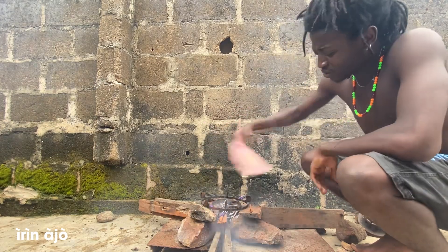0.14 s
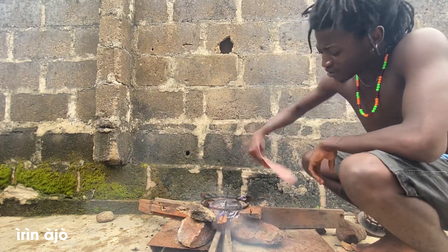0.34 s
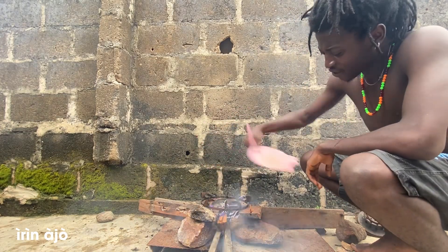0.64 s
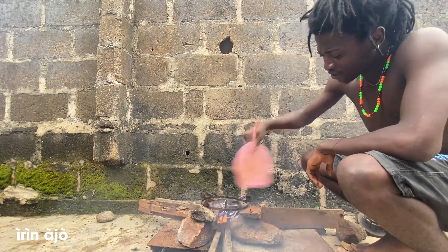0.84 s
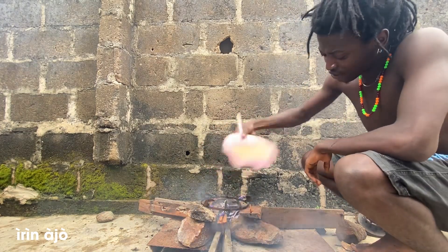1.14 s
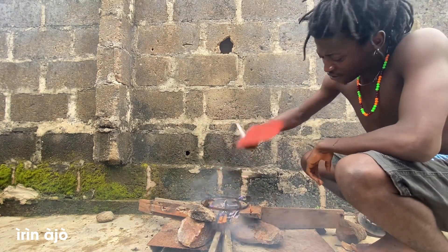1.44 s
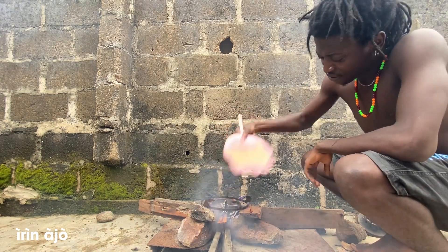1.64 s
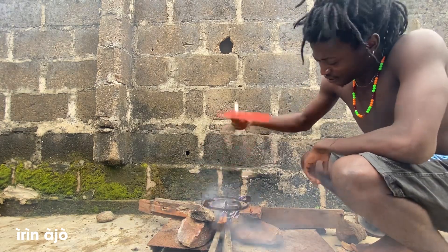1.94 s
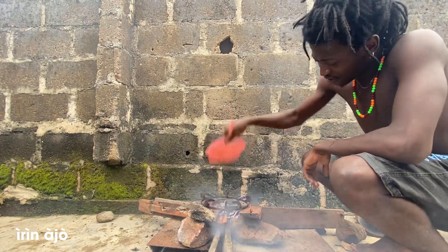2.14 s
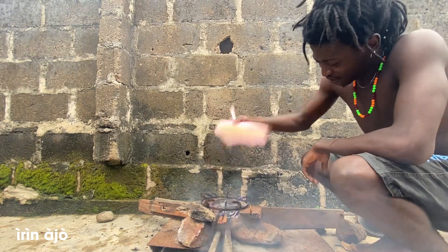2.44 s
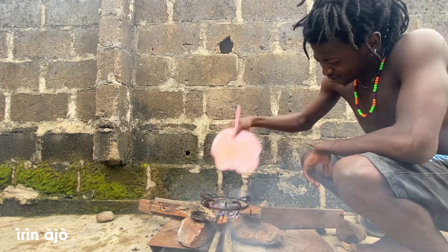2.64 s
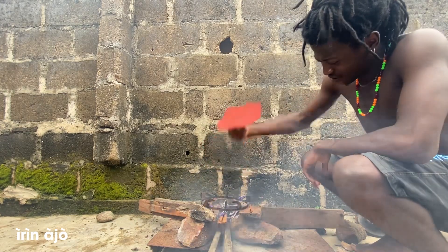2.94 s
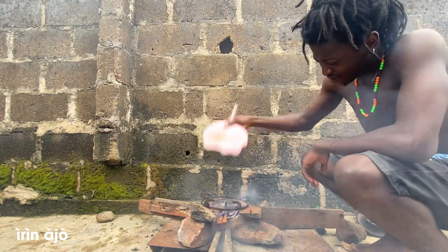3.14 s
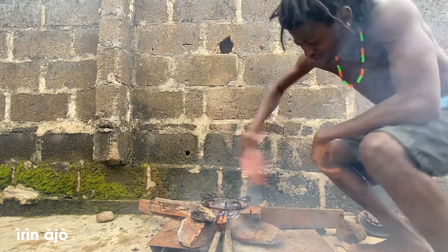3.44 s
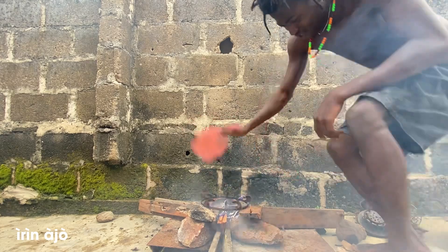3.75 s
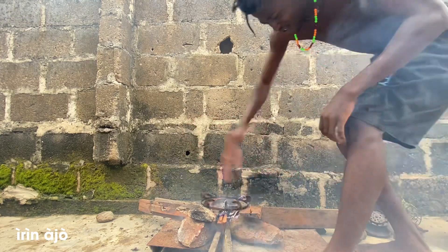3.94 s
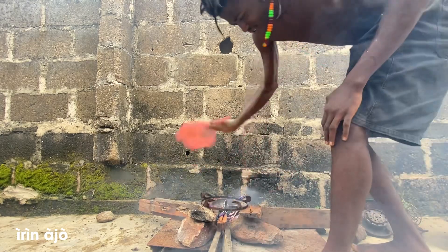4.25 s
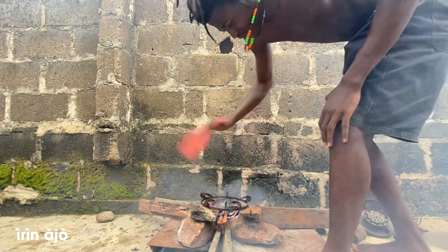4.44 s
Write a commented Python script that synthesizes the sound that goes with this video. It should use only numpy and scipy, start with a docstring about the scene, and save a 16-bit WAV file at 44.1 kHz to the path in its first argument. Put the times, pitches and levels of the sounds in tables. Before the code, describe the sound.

Outdoors in a walled yard, a stiff plastic fan beats about four times a second, each stroke an airy swish, a fluttery snap and a low thump. A small wood fire rumbles softly and ticks. Just before two seconds a log splits with a very loud crack, then the flaps grow louder and snappier, easing as feet scuff on grit. Close stereo microphone, short wall echoes.

```python
"""A plastic hand fan is waved about four times a second over a small wood fire in a walled yard.
Each stroke swishes as shaped noise, and the thin blade snaps over: throbbing tones flutter above low thumps.
The draught makes the flames, layers of noise, rumble and flutter more while a hiss sinks; embers tick.
One log splits in a quick run of cracks that ring it, and feet scuff as the fanner stands up."""
import sys
import numpy as np
from scipy import signal
from scipy.fft import rfft, irfft, next_fast_len
from scipy.io import wavfile
from scipy.ndimage import uniform_filter1d

SR = 44100
rng = np.random.default_rng(int(sys.argv[2]) if len(sys.argv) > 2 else 0)


def unload_wav(signal):
    """Save mono or channel-first audio to the path in sys.argv[1] as 16-bit WAV at rate SR, clipped to [-1, 1]."""
    wavfile.write(
        sys.argv[1],
        SR,
        np.round(np.clip(np.atleast_2d(signal).T, -1, 1) * 32767).astype(np.int16),
    )


def ratio(d):
    """dB to gain"""
    e = np.asarray(d, float) / 20
    return 10 ** e


N = 203389   # samples

# Air of the yard: pitch_hz, relative level_db
YARD_SPECTRUM = [(25, -0.5), (45, 6.5), (150, -8), (380, -18), (500, -18.5), (820, -23.5), (1650, -30),
                 (4000, -52)]
# Echoes of the yard walls: pitch_hz, echo level_db, t60_s
WALL_ECHOES = [(99.5, -14, 1), (252, -2, 0.071), (453, -1.5, 0.2), (740, -10.5, 0.24), (1115, -13.5, 0.26),
               (2000, -10.5, 0.36), (4944, -12.5, 0.23), (8000, -13, 0.35), (12000, -10.5, 0.25)]
# The two microphone ports: pitch_hz, left over right_db, left lead_rad, likeness of diffuse sound (0-1)
MIC_PORTS = [(60, -6.5, -.3, .97), (170, -7.2, -.1, .86), (300, -7, .5, .5), (550, -2, 1.6, .3),
             (1000, -2, .9, .3), (2000, 2, -.5, .3), (6500, 2, -.6, .2), (8000, 0, -1.2, .2),
             (9300, -1, -3.14, .2), (10300, -1, -5.4, .2), (12500, -1, -8.0, .2), (15000, -1, -10.5, .2)]
# Levels of the rumble, flutter and hiss layers between gusts: time_s, rumble_db, flutter_db, hiss_db
FLAME_LEVELS = [(0.0, -56.5, -62.5, -63.5), (0.25, -82, -80, -68), (0.6, -60.5, -67.5, -59.5),
                (1.0, -50, -59.5, -74), (1.2, -51.5, -77, -62), (1.4, -51.5, -57, -62.5),
                (1.6, -51, -68, -91), (1.779, -52, -71, -48), (1.951, -49, -55, -76),
                (2.178, -86, -88, -71), (2.339, -47, -60.5, -62), (2.702, -48, -63, -73.5),
                (3.1, -51.5, -59, -74), (3.39, -44.5, -77, -64.5), (3.54, -66, -77, -59.5),
                (3.621, -49, -79.5, -53.5), (3.8, -47.5, -63, -61), (4.169, -56.5, -74, -57),
                (4.3, -54, -77.5, -55.5), (4.47, -52.5, -74.5, -61.5), (4.61, -50.5, -64.5, -54.5)]
# Colours of the three flame layers: pitch_hz, relative level_db
RUMBLE_SPECTRUM = [(25, -8.5), (55, 10.5), (85, -7.5), (112, 7.5), (135, -7.5), (161, 7), (190, 0.5),
                   (262, -5), (380, -5.5), (600, -48)]
FLUTTER_SPECTRUM = [(250, -23.5), (400, 28), (500, 17.5), (650, 28), (900, 14), (1300, -16.5),
                    (2000, -50.5)]
HISS_SPECTRUM = [(900, 0.5), (1650, -7), (3500, -12), (7110, -19.5), (9320, -17.5), (11300, -21.5),
                 (12400, -18), (13200, -37.5), (16000, -54.5)]
# Level change at a full gust, rumble and flutter rise, hiss sinks: rumble_db, flutter_db, hiss_db
GUST_CHANGES = (6, 11, -4.8)
# The louder ember ticks: start_s, peak level_db, ring pitch_hz, sputter decay_ms
EMBER_TICKS = [(0.2385, -44.5, 2960, 2.5), (0.268, -43, 2260, 1.6), (0.42, -53.5, 5100, 3.2),
               (0.4893, -39.5, 3250, 2.4), (0.601, -58, 10600, 1), (0.700, -43, 4260, 3),
               (0.791, -61, 10700, 1), (0.899, -55.5, 3460, 7.7), (1.1109, -48.5, 2780, 2),
               (1.177, -45, 2400, 3.2), (1.4716, -53, 1960, 1.8), (1.5833, -50, 10900, 2.1),
               (1.6628, -58, 3465, 2), (2.095, -56, 10340, 0.73), (2.138, -52, 10640, 0.78),
               (2.2, -53, 8700, 1.6), (3.3644, -48.5, 2710, 1.7), (3.38, -48.5, 3780, 6.7),
               (3.409, -53, 3920, 1.5), (3.53, -59, 900, 2), (3.759, -49, 4230, 2.9),
               (4.0148, -53, 2130, 2), (4.192, -53.5, 10800, 1.5), (4.232, -55.5, 11050, 2.4),
               (4.373, -60.5, 2090, 2.6)]
# Soles on gritty ground: loudest_s, level_db, rise and fade scale_ms, brightness_db
SOLE_SCUFFS = [(3.193, -56.5, 2.5, 3.5), (3.36, -57, 18.5, 0), (3.492, -66, 16, -4),
               (3.595, -55, 24.5, 1.5), (3.647, -54.5, 27, 3), (3.74, -58, 24, 15.5),
               (3.872, -48.5, 14.5, 14), (3.898, -51, 17, 12), (3.968, -57, 19.5, 5.5)]
# Colour of the scuffs: pitch_hz, relative level_db
SCUFF_SPECTRUM = [(880, -1.5), (1500, -1), (1660, -13.5), (3250, -15), (5490, -9.5), (7840, -15),
                  (11300, -10), (16000, -13.5)]
# Log splitting, then bits dropping in the fire: start_s, snap peak_db, body peak_db, low cut_hz, high cut_hz
LOG_CRACKS = [(1.7680, -7.5, -4.5, 480, 9000), (1.771, -26, -8, 427, 5100), (1.7760, -2.5, -9.5, 330, 8900),
              (1.7800, -17, -5, 170, 4470), (1.7870, -26.5, -10.5, 90, 1500),
              (1.858, -59, -23.5, 279.3, 948), (1.8760, -60, -32, 480, 750), (1.8930, -56, -27, 100, 693),
              (1.9280, -58.5, -38, 450, 705)]
# Ringing modes of the log: pitch_hz, level_db, t60_s
LOG_RINGS = [(108, 0, 0.11), (161, -1.5, 0.24), (205, -2.5, 0.15), (270, 0.5, 0.078), (389, -4.5, 0.22),
             (610, -3, 0.02), (675, 6, 0.11), (870, -2, 0.078), (1135, -1, 0.024), (1321, 3.5, 0.008),
             (1830, -3, 0.014), (2220, -5.5, 0.014), (2565, -6, 0.011), (3840, -1.5, 0.0037)]
# Air past the blade edge: loudest_s, level_db, rise and fade scale_ms, brightness_db
BLADE_SWISHES = [(0.089, -61, 9, 20.5), (0.249, -53, 8, 17), (0.269, -57, 10, 20), (0.31, -62, 25, 14),
                 (0.467, -57.5, 23, 10), (0.551, -49.5, 9.5, 1), (.612, -69.5, 21, -12), (0.69, -55, 2, 19),
                 (0.703, -52.5, 6, 12), (0.743, -54.5, 20, 0), (1, -51.5, 34, 2), (1.026, -46, 8, 21.5),
                 (1.265, -43.5, 19, 3.5), (1.53, -44, 16.5, -1), (1.601, -71.5, 52.5, -8.5),
                 (2.147, -57.5, 37, 5), (2.272, -72, 15, -9), (2.335, -46, 13.5, 3),
                 (2.362, -48.5, 16.5, 3), (2.566, -47, 14, -4), (2.592, -53.5, 14.5, 8),
                 (2.795, -45.5, 20, 1.5), (3.045, -55, 25.5, -8.5), (3.834, -66, 42.5, -15.5),
                 (4.11, -48.5, 20.5, 5.5), (4.341, -47, 31.5, 8.5), (4.421, -62.5, 28, 15),
                 (4.574, -48, 43, 10.5)]
# Colour of the swishes: pitch_hz, relative level_db
SWISH_SPECTRUM = [(500, -13.5), (1090, 3.5), (1570, -9.5), (2070, -7), (2500, -13), (3000, -13),
                  (6400, -26), (8200, -36.5), (9330, -33.5), (11400, -28.5), (13000, -36.5), (15000, -51)]
# The whole blade jolting: start_s, peak level_db, favoured pitch_hz, length_ms
BLADE_THUMPS = [(0.247, -43, 420, 12), (0.495, -66, 91.5, 33), (0.493, -30.5, 347, 16),
                (0.55, -38, 162, 12.6), (0.697, -58, 205, 21), (0.76, -30, 404, 13),
                (0.821, -31.5, 118, 22), (0.902, -47, 272, 7.8), (1.023, -30.5, 246, 13),
                (1.085, -36.5, 116, 25), (1.151, -41.5, 173, 8.5), (1.176, -35, 112.5, 11),
                (1.31, -42.5, 264, 9.3), (1.351, -32, 200.1, 13.3), (1.412, -37.5, 169.9, 15),
                (1.445, -41, 138.8, 16), (1.579, -37, 260, 9.8), (1.629, -29.5, 196, 20),
                (1.691, -47.5, 148.1, 11), (2.137, -35.5, 147, 25.2), (2.186, -29.5, 125, 18),
                (2.3, -45.5, 91.5, 6.2), (2.353, -37.5, 113, 18), (2.422, -24, 202, 8.4),
                (2.436, -39, 102, 16), (2.611, -39.5, 194, 17), (2.654, -25, 156.8, 19.5),
                (2.666, -43, 264, 5.6), (2.801, -39, 188.8, 16.6), (2.838, -33.5, 205, 11.3),
                (2.875, -31.5, 266, 18), (2.905, -35, 108, 10.4), (3.08, -37.5, 215, 35),
                (3.129, -26, 262, 3), (3.271, -28.5, 510, 22), (3.285, -34.5, 200, 24),
                (3.37, -41.5, 166.6, 12.6), (3.55, -39.5, 318, 8.9), (3.571, -38.5, 102, 19.4),
                (3.647, -33.5, 116, 5.4), (3.794, -39.5, 332, 22), (3.814, -33.5, 105, 20),
                (3.882, -30.5, 145, 7.3), (4.033, -29, 344, 11.9), (4.059, -36.5, 113, 20),
                (4.122, -34, 161, 8.3), (4.265, -33, 202, 17), (4.289, -30, 115, 16),
                (4.34, -34.5, 205, 16), (4.354, -38.5, 161, 9.1), (4.496, -34.5, 347, 8.2),
                (4.519, -34.5, 112, 12.8), (4.582, -33, 152, 17)]
# Low modes rung by each jolt, before each jolt's shift: pitch_hz, level_db, t60_s
LOW_MODES = [(108, 3, 0.097), (161, -4, 0.14), (205, 4, 0.028), (264, -1, 0.32), (318, 0.6, 0.024),
             (347, 0.75, 0.043), (600, 0, 0.098), (650.2, -0.5, 0.098)]
# Blade snapping over: start_s, level_db, mid-burst pitch_hz, glide (share of pitch), length_ms
BLADE_FLAPS = [(0.236, -38, 880, -0.18, 5.9), (0.246, -27.5, 822, 0.35, 24.2), (0.488, -40, 1040, 0.13, 4),
               (0.496, -28, 772, -0.014, 16), (0.525, -42, 625, 0.022, 19.5), (0.547, -39.5, 807, 0.16, 19),
               (0.695, -45, 820, -0.022, 11), (0.757, -28.5, 869, 0.25, 17.4), (0.82, -28, 887, -0.1, 10.8),
               (1.023, -34, 816, 0.029, 23.7), (1.081, -22.5, 862, 0.11, 8.2),
               (1.174, -36.5, 559.4, 0.48, 9.9), (1.191, -42.5, 860, 0.23, 17),
               (1.306, -39, 848, 0.23, 13.4), (1.353, -24.5, 820, 0.061, 8.1), (1.444, -38, 510, 0.4, 9),
               (1.454, -37.5, 650, 0.0023, 20), (1.626, -38.5, 876, 0.042, 19),
               (2.129, -35.5, 921, 0.3, 17), (2.186, -34, 804, 0.015, 15), (2.378, -26, 874, 0.11, 16),
               (2.421, -19.5, 825, -0.037, 9.06), (2.423, -36.5, 1400, 0.32, 6.1),
               (2.434, -32.5, 624.6, 0.051, 14), (2.606, -29.5, 873, -0.025, 17),
               (2.65, -14, 894, -0.054, 6.66), (2.651, -29.5, 1294, 0.053, 9),
               (2.661, -31.5, 610, 0.014, 11.4), (2.833, -29.5, 823, 0.16, 16),
               (2.874, -14.5, 888, 0.005, 8.7), (2.875, -34.5, 1355, 0.053, 4.3),
               (2.880, -23.5, 603, 0.03, 12), (3.082, -22, 876, -0.2, 17.6),
               (3.130, -19, 1011, -0.048, 6.1), (3.130, -44.5, 1323, -0.066, 8.4),
               (3.137, -21.5, 603, 0.0071, 14.2), (3.271, -18, 634, -0.14, 6.4),
               (3.271, -29.5, 1028, 0.0082, 9.6), (3.280, -28, 655, 0.19, 12),
               (3.308, -40.5, 610, -0.036, 12), (3.559, -37, 870, 0.097, 10.8),
               (3.570, -39.5, 897, 0.02, 7.9), (3.645, -39.5, 605, 0.19, 28),
               (3.648, -40.5, 950, 0.16, 15.6), (3.792, -35.5, 800, 0.19, 22),
               (3.882, -42.5, 646, 0.17, 11.4), (4.035, -30.5, 716, -0.23, 11.2),
               (4.044, -32, 1018, 0.14, 21.5), (4.117, -39, 574, -0.15, 25),
               (4.269, -30.5, 820, 0.05, 16.7), (4.287, -38.5, 866, 0.11, 11),
               (4.302, -41, 1140, -0.043, 11.4), (4.368, -41.5, 1470, .03, 8.3),
               (4.367, -41.5, 622, -0.13, 12), (4.501, -32, 771, 0.13, 24), (4.569, -38, 586, -0.047, 26.4),
               (4.588, -33, 555, 0.082, 10)]

YARD_DB = -62
ECHO_TOP_HZ = 12600   # top of the echoes' treble
MIC_LOW_HZ, MIC_HIGH_HZ = 52, 14100
GUST_PEAK_MS = 52.5   # a gust is strongest this long after the swish is loudest
GUST_FOLLOWS = 0.48   # share of the swish's dB swing
TICK_T60_S = 0.003
SWISH_RISE, SCUFF_RISE = 0.34, 0.4   # share of a swell's length spent rising
SWISH_GRIT_DB, SCUFF_GRIT_DB = 2.0, 0.69   # roughness, in steps of 64 samples
TREBLE_NARROWS = 1.4   # the treble of a swell rises and falls this much more steeply than its low part
EDDY_DB = 2.5   # eddies lift patches of a swell, a few hundred Hz wide and some ms long
GRIP_DB_PER_OCTAVE = 6.5   # modes away from the favoured pitch are excited less
MODE_SPREAD = 0.05   # share by which the modes shift at each jolt


def rms_one(x):
    """Scale to unit rms."""
    return x / np.sqrt(np.mean(x ** 2) + 1e-20)


def at_hz(points, hz, column=1):
    """Read a table on a log-frequency axis."""
    points = np.array(points)
    return np.interp(np.log(np.maximum(hz, 1)), np.log(points[:, 0]), points[:, column])


def drift(rate_hz):
    """Slow random wander of rms about 1: low-passed noise, drawn 60 times a second."""
    knots = rng.standard_normal(int(N / SR * 60) + 2)
    smooth = signal.lfilter([1], [1, -np.exp(-2 * np.pi * rate_hz / 60)], knots)
    return np.interp(np.arange(N) * 60 / SR, np.arange(len(knots)), rms_one(smooth))


def coloured(x, spectrum):
    """Shape noise by a spectrum, at unit rms."""
    hz = np.fft.rfftfreq(x.shape[-1], 1 / SR)
    return rms_one(irfft(rfft(x) * ratio(at_hz(spectrum, hz)), x.shape[-1]))


def ring(x, hz, t60_s):
    """Two-pole resonator: a unit click sets a sine of height 1 ringing."""
    r = ratio(-60 / (t60_s * SR))
    w = 2 * np.pi * hz / SR
    return signal.lfilter([0, np.sin(w)], [1, -2 * r * np.cos(w), r * r], x + 1e-18)


def cut(x, hz, kind, order=2):
    """Butterworth low- or high-pass."""
    sos = signal.butter(order, np.clip(hz, 20, .45 * SR), kind, fs=SR, output="sos")
    return signal.sosfilt(sos, x)


def add(out, start_s, piece):
    """Mix a piece in at its start time."""
    i = round(start_s * SR)
    out[i:i + len(piece)] += piece[:N - i]


def burst(noise, shape):
    """A short burst of noise with an even spectrum: many tiny fibres let go at once."""
    for _ in range(4):
        spec = rfft(noise * shape)
        noise = irfft(spec / (np.abs(spec) + 1e-9), len(noise)) / (shape + 0.05)
    return noise * shape


def patchy(x, spread_db):
    """Uneven patches of level over time and pitch."""
    spec = signal.stft(x, nperseg=256)[2]
    patches = uniform_filter1d(rng.standard_normal(spec.shape), size=5, axis=0)
    patches = uniform_filter1d(patches, size=5, axis=1)
    uneven = spec * ratio(spread_db * rms_one(patches))
    return rms_one(signal.istft(uneven, nperseg=256)[1][:N])


def swells(rows, rise_share, spectrum, pivot_hz, grit_db):
    """Noise that swells and fades at each row; brightness lifts the part above the pivot."""
    ms = np.arange(N) / SR * 1000
    dull, bright = np.zeros(N), np.zeros(N)
    for loudest_s, level_db, length_ms, bright_db in rows:
        gap = ms - loudest_s * 1000
        rise, fall = rise_share * length_ms, (1 - rise_share) * length_ms
        away = np.where(gap < 0, gap / max(rise, 1), gap / max(fall, 1))
        fade_db = -6 * (np.hypot(away, 1) - 1)   # round top, straight flanks in dB
        dull += ratio(level_db + fade_db - bright_db / 2)
        bright += ratio(level_db + TREBLE_NARROWS * fade_db + bright_db / 2)
    noise = rng.standard_normal(N)
    steps = np.repeat(rng.standard_normal(N // 64 + 1), 64)[:N]
    grit = noise * ratio(grit_db * steps)
    air = patchy(coloured(grit, spectrum), EDDY_DB)
    low = cut(air, pivot_hz, "low", order=1)
    return dull * low + bright * (air - low)


def ports(x):
    """Two channels as the ports hear x; a pair of signals is spread as diffuse sound."""
    size = next_fast_len(x.shape[-1] + 2048)
    hz = np.fft.rfftfreq(size, 1 / SR)
    # half the level and phase difference goes to each side
    tilt = ratio(at_hz(MIC_PORTS, hz) / 2) * np.exp(.5j * at_hz(MIC_PORTS, hz, column=2))
    spec = rfft(x, size)
    if x.ndim == 1:
        return irfft(spec * [tilt, 1 / tilt], size)[:, :x.shape[-1]]
    alike = np.clip(at_hz(MIC_PORTS, hz, column=3), 0, 1)
    mid = np.sqrt((1 + alike) / 2) * spec[0]
    side = np.sqrt((1 - alike) / 2) * spec[1]
    return irfft([(mid + side) * tilt, (mid - side) / tilt], size)[:, :x.shape[-1]]


def walls(x):
    """Dense echoes of the yard walls: noise that dies band by band, convolved with the dry sound."""
    t = np.arange(SR * 3 // 5) / SR
    edges = 45 * 2 ** np.arange(0, 8.9, .7)
    # separate walls answer in clumps
    returns = ratio(1.5 * rms_one(cut(rng.standard_normal(len(t)), 34, "low")))
    echo = 0
    for low, high in zip(edges, edges[1:]):
        hz = np.sqrt(low * high)
        sos = signal.butter(2, [low, min(high, .45 * SR)], "band", fs=SR, output="sos")
        band = signal.sosfilt(sos, rng.standard_normal((2, len(t))))
        dying = ratio(-60 * t / at_hz(WALL_ECHOES, hz, column=2))
        echo = echo + band * dying * ratio(at_hz(WALL_ECHOES, hz)) / np.sqrt(np.sum(dying ** 2))
    echo = cut(echo, ECHO_TOP_HZ, "low", order=10)
    # ground and near wall first, far walls later
    near_wall = 5.57 * (t > .004) * np.exp(-t / 0.0071)
    far_walls = np.clip((t - .005) / 0.02, 0, 1)
    echo = ports(echo * returns * (far_walls + near_wall))
    return signal.fftconvolve(x[None], echo, axes=1)[:, :N]


def yard_air():
    """Diffuse low-heavy noise of the yard, its level wandering slightly."""
    air = coloured(rng.standard_normal((2, N)), YARD_SPECTRUM)
    return ports(ratio(YARD_DB) * air * ratio(0.5 * drift(5.7)))


def gusts():
    """Draught at the fire, 0-1: louder and longer strokes push more air, which arrives late and ebbs."""
    loudest_s, level_db, length_ms, _ = np.transpose(BLADE_SWISHES)
    push = ratio(GUST_FOLLOWS * level_db) * length_ms
    age = np.maximum(np.arange(N) / SR - loudest_s[:, None], 0) * 1000 / GUST_PEAK_MS
    return np.tanh(push / np.median(push) @ (age * np.exp(1 - age)) ** 2)


def flames():
    """The draught makes the flames rumble in lumps and flutter above that, while a hiss sinks."""
    time_s, *levels = np.transpose(FLAME_LEVELS)
    t, draught = np.arange(N) / SR, gusts()
    spectra = RUMBLE_SPECTRUM, FLUTTER_SPECTRUM, HISS_SPECTRUM
    lump_rates_hz = 15, 15, 14
    out = 0
    for spectrum, level_db, change_db, rate_hz in zip(spectra, levels, GUST_CHANGES, lump_rates_hz):
        layer = coloured(rng.standard_normal((2, N)), spectrum)
        between_gusts_db = np.interp(t, time_s, level_db)
        out = out + layer * ratio(between_gusts_db + change_db * draught + 2.2 * drift(rate_hz))
    return ports(out)


def embers():
    """Sputtering sparks excite short rings, over a faint crackle of random clicks."""
    out, ms = np.zeros(N), np.arange(SR // 50) / SR * 1000
    for start_s, level_db, pitch_hz, sputter_ms in EMBER_TICKS:
        noise = rng.standard_normal(len(ms))
        spark = noise * np.minimum(ms / 0.6, 1) * np.exp(-ms / np.clip(sputter_ms, .3, 8))
        tick = cut(spark, .5 * pitch_hz, "high") + 0.68 * ring(spark, pitch_hz, TICK_T60_S)
        add(out, start_s, ratio(level_db) * tick / np.abs(tick).max())
    sizes = ratio(-56.0 + 1.1 * np.minimum(rng.exponential(1, N), 4)) * rng.choice([-1, 1], N)
    # about 90 clicks a second, in clumps
    born = rng.random(N) < 90.0 * ratio(5.0 * drift(8)) / SR
    return out + cut(sizes * born, 10000, "high")


def scuffs():
    """Soles drag on grit: short swells of rough noise."""
    return swells(SOLE_SCUFFS, SCUFF_RISE, SCUFF_SPECTRUM, 4400, SCUFF_GRIT_DB)


def log_cracks():
    """Each split is a bright snap and a few ms of splintering that rings the log."""
    out, ms = np.zeros(N), np.arange(SR // 8) / SR * 1000
    for start_s, snap_db, body_db, lowest_hz, highest_hz in LOG_CRACKS:
        noise = rng.standard_normal(len(ms))
        snap = cut(burst(noise, np.exp(-ms / 0.9)), 1500, "high")
        snap = cut(snap, 8000, "low", order=1)
        splinter = burst(noise[::-1], np.minimum(ms / 0.23, 1) * np.exp(-ms / 1.5))
        body = sum(ratio(db) * rms_one(ring(splinter, hz, t60_s)) for hz, db, t60_s in LOG_RINGS)
        body = body + ratio(0.5) * rms_one(cut(splinter, 3000, "low", order=1))
        body = cut(body, lowest_hz, "high", order=3)
        body = cut(body, highest_hz, "low", order=5)
        add(out, start_s, ratio(snap_db) * snap / np.abs(snap).max())
        add(out, start_s, ratio(body_db) * body / np.abs(body).max())
    return out


def swishes():
    """Air tears past the blade edge: swells of noise with eddies in them."""
    return swells(BLADE_SWISHES, SWISH_RISE, SWISH_SPECTRUM, 5300, SWISH_GRIT_DB)


def thumps():
    """Each jolt sets the low modes ringing, mostly those near the pitch that the grip favours."""
    out, ms = np.zeros(N), np.arange(SR // 4) / SR * 1000
    chance = rng.standard_normal((len(BLADE_THUMPS), len(LOW_MODES), len(ms)))
    bends = 1 + MODE_SPREAD * rng.standard_normal(len(BLADE_THUMPS))
    for (start_s, level_db, favoured_hz, length_ms), jolts, bend in zip(BLADE_THUMPS, chance, bends):
        shape = np.sqrt(np.clip(np.minimum(ms / 5.4, (max(length_ms, 3) - ms) / 20.0), 0, 1))
        lows = 0
        for (mode_hz, mode_db, t60_s), jolt in zip(LOW_MODES, jolts):
            grip_db = -GRIP_DB_PER_OCTAVE * abs(np.log2(mode_hz / favoured_hz))
            lows = lows + ratio(mode_db + grip_db) * rms_one(ring(jolt * shape, bend * mode_hz, t60_s))
        lows = cut(lows, 68, "high", order=4)   # the lows are trimmed below 68 Hz
        add(out, start_s, ratio(level_db) * lows / np.abs(lows).max())
    return out


def flaps():
    """The blade snaps over and flutters in a short throbbing burst that glides in pitch."""
    out, ms = np.zeros(N), np.arange(SR // 16) / SR * 1000
    for start_s, level_db, pitch_hz, glide, length_ms in BLADE_FLAPS:
        noise, waver, throb = rng.standard_normal((3, len(ms)))
        part = ms / max(length_ms, 2)
        shape = np.clip(np.minimum(ms / (1.5 + 0.13 * length_ms), (length_ms - ms) / 4.5), 0, 1)
        gliding_hz = pitch_hz * (1 + glide * np.clip(2 * part - 1, -.8, .8))
        hz = gliding_hz * (1 + 0.081 * rms_one(cut(waver, 140, "low")))
        tone = np.sin(2 * np.pi * np.cumsum(hz) / SR)
        tone = tone * ratio(1.8 * rms_one(cut(throb, 89, "low")))
        rasp = cut(cut(noise, 1.464 * pitch_hz, "low", order=4), 0.5 * pitch_hz, "high")
        rasp = ratio(-6.0) * rms_one(rasp)
        blade = cut((tone + rasp) * shape, 1.443 * pitch_hz, "low", order=7)
        # abrupt flips click: the shorter the burst, the louder the snap
        snap = noise * np.exp(-((ms - 0.12 * length_ms) / 1.8) ** 2)
        snap = cut(snap, 1900, "low", order=7) * ratio(-2.9 * length_ms)
        add(out, start_s, ratio(level_db) * (blade / np.abs(blade).max() + snap))
    return out


def scene():
    """Near sounds reach the ports directly and off the walls; flames and yard air are diffuse."""
    blade = flaps() + thumps()
    fire_bits = log_cracks() + embers()
    near = blade + fire_bits + swishes() + scuffs()
    yard = yard_air()
    return ports(near) + walls(near) + flames() + yard


def band_limit(x):
    """A steep low-pass at the top of the band."""
    return signal.sosfilt(signal.butter(12, 16830, fs=SR, output="sos"), x)


def record(dry):
    """The microphone trims the deep bass and the top treble."""
    trimmed = cut(dry, MIC_LOW_HZ, "high")
    mix = cut(trimmed, MIC_HIGH_HZ, "low", order=4)
    return band_limit(mix)


dry = scene()
out = record(dry)
unload_wav(out)
```